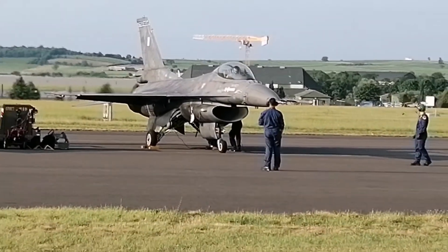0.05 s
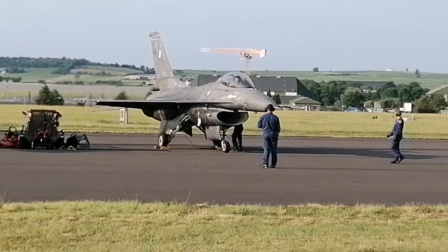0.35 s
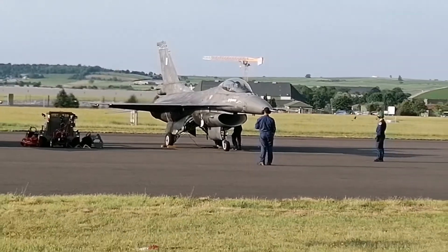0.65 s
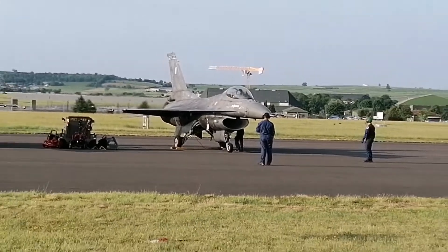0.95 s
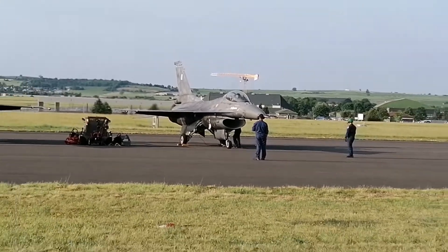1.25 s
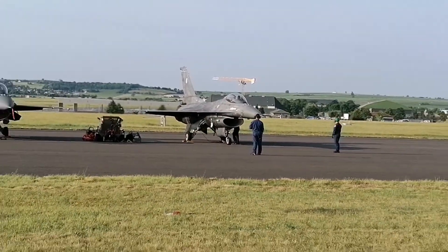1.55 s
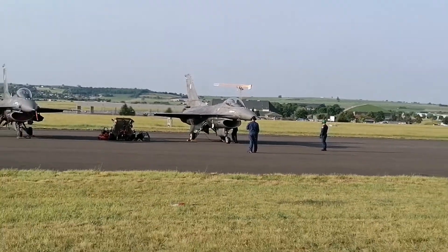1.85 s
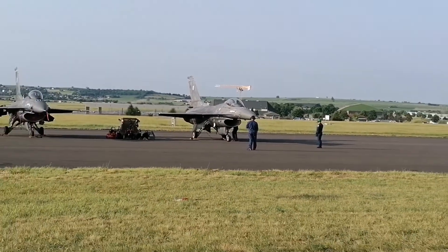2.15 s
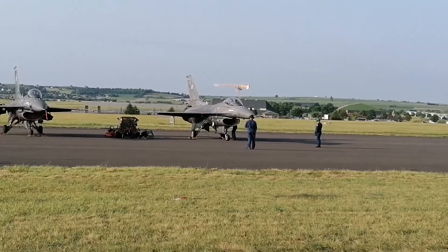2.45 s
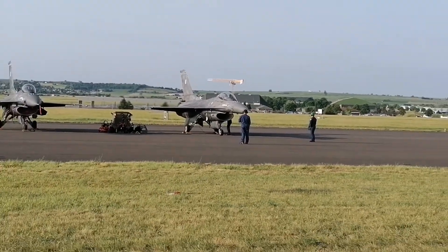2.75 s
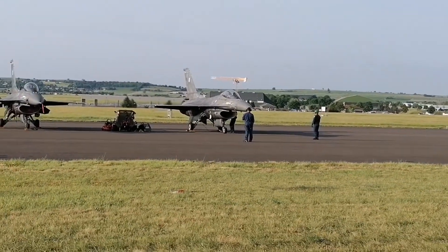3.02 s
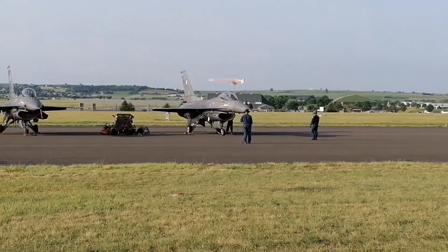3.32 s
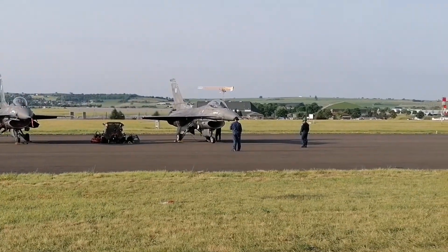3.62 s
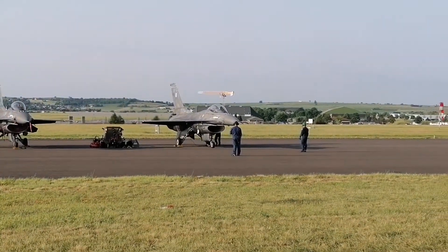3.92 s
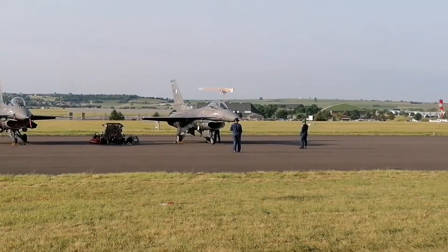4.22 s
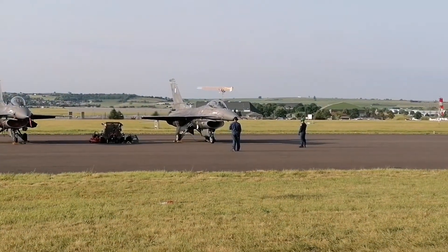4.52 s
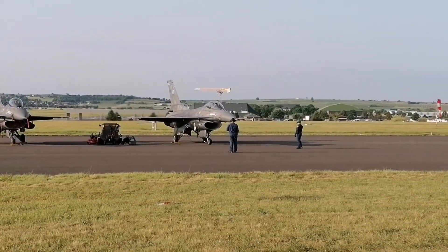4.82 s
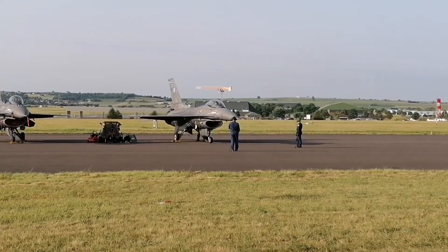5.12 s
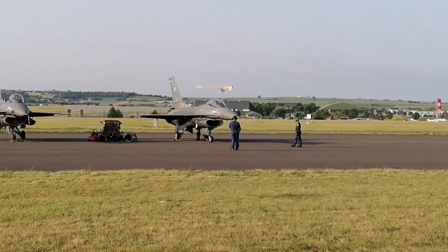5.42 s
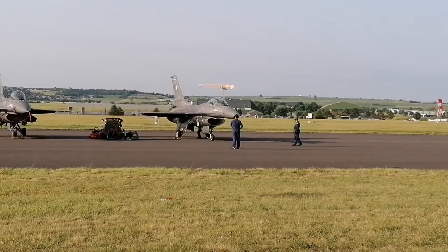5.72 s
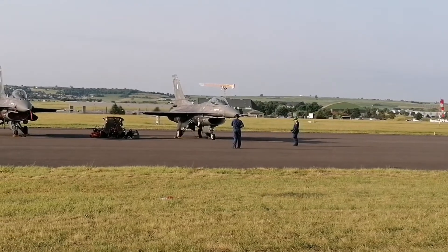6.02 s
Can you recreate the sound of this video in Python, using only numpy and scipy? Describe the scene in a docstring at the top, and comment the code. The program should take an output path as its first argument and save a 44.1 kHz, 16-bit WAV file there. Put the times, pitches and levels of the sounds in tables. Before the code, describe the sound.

A jet turbine whines and hisses across an open apron, its pitch settling slightly above a low roar and faint hum.

```python
"""A fighter jet's starter turbine, running on an open apron some way from a mono microphone.
Rushing gas rings the modes of its duct: a fuzzy, fluttering whine that starts sharp and settles.
Around it are hiss, a low exhaust roar and a faint machine hum. Direct and reflected sound cancel
at the microphone in hollow notches, which slide down through the hiss as it mellows."""
import sys
import numpy as np
from scipy import signal
from scipy.fft import rfft, irfft, next_fast_len
from scipy.io import wavfile
from scipy.ndimage import uniform_filter1d

SR = 44100
rng = np.random.default_rng(int(sys.argv[2]) if len(sys.argv) > 2 else 0)


def file_out(sig):
    """Save sig as 16-bit WAV at sys.argv[1]."""
    # one column per channel
    cols = np.atleast_2d(sig).T
    # limit, then scale
    lim = np.clip(cols, -1, 1)
    pcm = np.round(lim * 32767).astype(np.int16)
    wavfile.write(sys.argv[1], SR, pcm)


N = 267687
FRAME, HOP = 2048, 512
TIME = np.arange(N) / SR
FRAME_TIME = np.arange(N // HOP + 3)[:, None] * HOP / SR
BIN_HZ = np.fft.rfftfreq(FRAME, 1 / SR)


def gain_of(db):
    """Decibels to amplitude."""
    return 10 ** (np.asarray(db) / 20)


def blend(first, last, share):
    """Moves from first to last as share goes from 0 to 1."""
    return first + (last - first) * share


def ease(at_s, over_s):
    """A smooth step from 0 to 1 across the frames, halfway at at_s."""
    return .5 + .5 * np.tanh((FRAME_TIME - at_s) / over_s)


def follow(rows):
    """The columns of a curve table at every sample."""
    seconds, *columns = np.transpose(rows)
    return [np.interp(TIME, seconds, column) for column in columns]


def spectra(rows):
    """The columns of a spectrum table at every bin, joined on a log-frequency axis."""
    hz, *columns = np.transpose(rows)
    return [np.interp(np.log(BIN_HZ + 1), np.log(hz), column) for column in columns]


def wander(rate_hz):
    """Random drift of unit size, up to about rate_hz changes a second."""
    size = next_fast_len(N)
    lowpass = np.exp(-(np.fft.rfftfreq(size, 1 / SR) / rate_hz) ** 2)
    drift = irfft(rfft(rng.standard_normal(size)) * lowpass, size)[:N]
    return drift / drift.std()


def turbulence(shape):
    """Noise shaped by a gain in each frame and bin."""
    real, imag = rng.standard_normal((2, len(FRAME_TIME), len(BIN_HZ)))
    spectrum = (real + 1j * imag) * shape
    return signal.istft(spectrum.T, nperseg=FRAME, noverlap=FRAME - HOP)[1][:N]


def slow_rms(x, samples):
    """The running strength of x, too slow to follow its fast grain."""
    power = uniform_filter1d(uniform_filter1d(x ** 2, samples), samples // 2)
    return np.sqrt(np.abs(power) + 1e-20)


def reflection_notches():
    """Gain on the way to the microphone: direct and reflected sound cancel in sliding notches."""
    # Each row: width in Hz, middle and spread of the slide in seconds, first and last frequency in Hz,
    # first and last depth in dB.
    notches = [(141, 3, .8, 1445, 1358, 10.5, 9.5), (88, 3.5, .6, 3710, 3620, 7.5, 1.5),
               (115, 3.8, .45, 4630, 4330, 6, 6.5), (78, 4.1, .6, 5040, 4865, 8, 9.5),
               (76, 4.1, 0.79, 5520, 5160, 12.5, 6), (85, 3.2, .7, 5925, 5875, 13, 7),
               (75, 3.6, .6, 6410, 6330, 7.5, 0), (100, 3.5, 1.4, 7320, 6560, 9, 4)]
    cut_db = 0
    for width_hz, at_s, over_s, first_hz, last_hz, first_db, last_db in notches:
        slide = ease(at_s, over_s)
        offset_hz = BIN_HZ - blend(first_hz, last_hz, slide)
        cut_db += blend(first_db, last_db, slide) * np.exp(-(offset_hz / width_hz) ** 2)
    return gain_of(-cut_db)


def duct_mode(hz, below_hz, above_hz):
    """A duct mode cuts on sharply below its frequency and trails off above it."""
    offset_hz = BIN_HZ - hz
    width_hz = np.where(offset_hz < 0, below_hz, above_hz)
    return 1 / (1 + (offset_hz / width_hz) ** 2)


def settling(name):
    """Pitch factor of a duct mode, which starts sharp and sinks to its note."""
    # Each entry, by mode: share sharp at the start, settling time in seconds.
    glides = {"howl": (0.063, 1.4), "low": (.031, .75), "middle": (.035, .9), "high": (.028, 1.8),
              "weak": (.02, 2.5)}
    sharp, settle_s = glides[name]
    return 1 + sharp * np.exp(-FRAME_TIME / settle_s)


def flutter(name, depth_db=0.79, flare_s=0.022):
    """Level swing in dB: each mode flutters on its own in the moving air, and some flare briefly."""
    # Each row: time of the peak in seconds, mode that flares, rise in dB.
    flares = [(1.2, "low", 3), (2.64, "howl", 4.5), (3.65, "howl", 6), (3.75, "low", 3), (4.01, "howl", 5),
              (5.27, "low", 4)]
    flare_db = sum(db * np.exp(-((TIME - at_s) / flare_s) ** 2)
                   for at_s, mode, db in flares if mode == name)
    return depth_db * wander(rate_hz=7) + flare_db


def whine(mellow, path, low_db, middle_db, high_db, howl_db=-38.5):
    """Turbulence rings four strong duct modes into fuzzy tones: a howl and three whistles above it."""
    # Each mode: settled pitch in Hz, nominal widths below and above it in Hz, level trim in dB.
    howl = (1079.5, 134, 205.5, -0.5)
    low_whistle = (2102.5, 33.5, 66, -0.1)
    middle_whistle = (3186, 59, 73.5, -0.93)
    high_whistle = (4125, 124, 154, 0.15)
    modes = [("howl", howl, howl_db), ("low", low_whistle, low_db),
             ("middle", middle_whistle, middle_db), ("high", high_whistle, high_db)]
    spread = blend(0.9, 0.95, mellow)  # the modes widen a little as the flow settles
    tones = 0
    for name, (hz, below_hz, above_hz, trim_db), level_db in modes:
        gain = gain_of(level_db + flutter(name) + trim_db)
        resonance = duct_mode(hz * settling(name), below_hz * spread, above_hz * spread)
        ring = turbulence(resonance * path)
        tones += gain * ring / slow_rms(ring, samples=5600)
    return tones


def hiss(mellow, path, treble_db, treble_hz=4450, flicker_db=0.28):
    """Broad jet hiss with the weaker duct modes riding on it; eddies in the air make it flicker."""
    # Each row: frequency in Hz, relative level of the hiss in dB at first and when mellow.
    hiss_spectrum = [(496, -29.5, -36.5), (1290, -12, -10.5), (1700, -7.5, -8.5), (1980, -8, -5.5),
                     (2280, -3.5, -0.3), (3050, 0.5, 0), (3840, -2.5, -1.2), (4710, -1.5, -1),
                     (5720, -2.5, -8), (6700, -2, -8), (7300, -7, -10.5), (7560, -13.5, -21.5),
                     (7690, -27, -39)]
    # Each row: settled pitch in Hz, widths below and above it in Hz, dB over the hiss at first
    # and when mellow.
    weak_modes = [(3280, 90, 240, 9, -2.5), (5220, 190, 250, 8, 7.5), (6190, 200, 385, 6, 8)]
    pitch = settling("weak")
    power = 1
    for hz, below_hz, above_hz, first_db, last_db in weak_modes:
        strength = gain_of(blend(first_db, last_db, mellow))
        power += (strength * duct_mode(hz * pitch, below_hz, above_hz)) ** 2
    colour = gain_of(blend(*spectra(hiss_spectrum), mellow))
    rush = turbulence(colour * np.sqrt(power) * path)
    # The whole hiss is scaled so that its treble sits at treble_db.
    treble = signal.sosfilt(signal.butter(12, treble_hz, "high", fs=SR, output="sos"), rush)
    gain = gain_of(treble_db + flicker_db * wander(rate_hz=16))
    return gain * rush / slow_rms(treble, samples=6000)


def exhaust(start_db=-42.8, rise_db_per_s=0.4648):
    """The low roar of the exhaust, booming near its pipe resonances and slowly growing."""
    # Each row: frequency in Hz, relative level in dB.
    roar_spectrum = [(15, -37), (30, -28.5), (47, -10), (80, -11), (120, -1.5), (145, -7.5), (170, 0.5),
                     (205, -0.5), (228, -10.5), (330, -10.5), (500, -11.5), (800, -14.5), (1400, -22),
                     (3000, -35)]
    roar = turbulence(gain_of(spectra(roar_spectrum)[0]))
    return gain_of(start_db + rise_db_per_s * TIME) * roar / slow_rms(roar, samples=9000)


def machine_hum(waver=.002, swell_db=4.0):
    """Thin tones of the running machinery, wavering in pitch and strength."""
    # Each row: frequency in Hz, amplitude in dB about which the tone swells and fades.
    tones = [(168, -57.5), (322, -61.5), (689, -61), (1378, -70.5)]
    wavering_time = np.cumsum(1 + waver * wander(rate_hz=4)) / SR
    return sum(gain_of(db + swell_db * wander(rate_hz=1.3)) * np.sin(2 * np.pi * hz * wavering_time)
               for hz, db in tones)


def scene():
    """The turbine from across the apron, all layers running throughout, the same in both channels."""
    # Each row: time in seconds, then levels in dB of the low, middle and high whistles
    # and of the treble of the hiss.
    levels = [(0, -26.5, -25.5, -28.5, -26.5), (.3, -23, -27, -29.5, -27),
              (1.05, -24.3, -29.5, -29.3, -27.5), (1.6, -24.5, -28, -31.5, -28.5),
              (2.8, -26, -26, -31.5, -29), (3.3, -30, -27, -32, -30), (3.8, -28, -26.5, -29, -31.5),
              (4.1, -28.5, -27, -31.5, -29.8), (5.1, -27.5, -26.5, -29, -31),
              (6.07, -26.5, -27.5, -28.8, -30.5)]
    low_db, middle_db, high_db, treble_db = follow(levels)
    mellow = ease(at_s=2.9, over_s=.9)
    path = reflection_notches()
    tones = whine(mellow, path, low_db, middle_db, high_db)
    jet = tones + hiss(mellow, path, treble_db) + exhaust() + machine_hum()
    return np.array([jet, jet])


def record(dry):
    """The recorder's steep band limit cuts off the top of the hiss."""
    edge_hz = 7740
    lowpass = signal.firwin(601, edge_hz, window=("kaiser", 9), fs=SR)
    return signal.oaconvolve(dry, lowpass[None], "same")


dry = scene()
out = record(dry)
file_out(out)
```